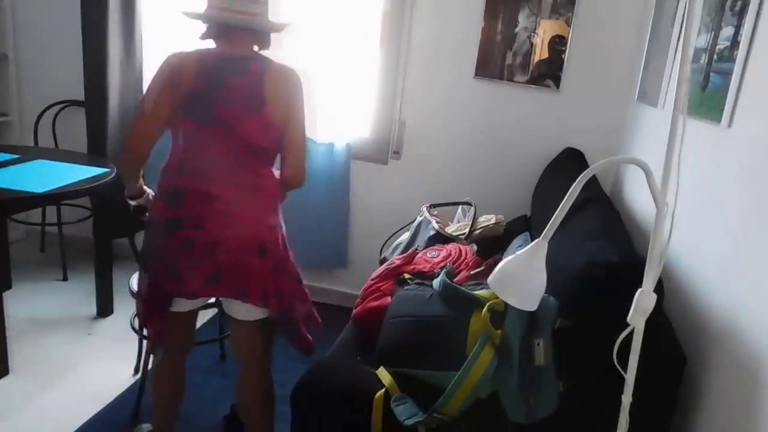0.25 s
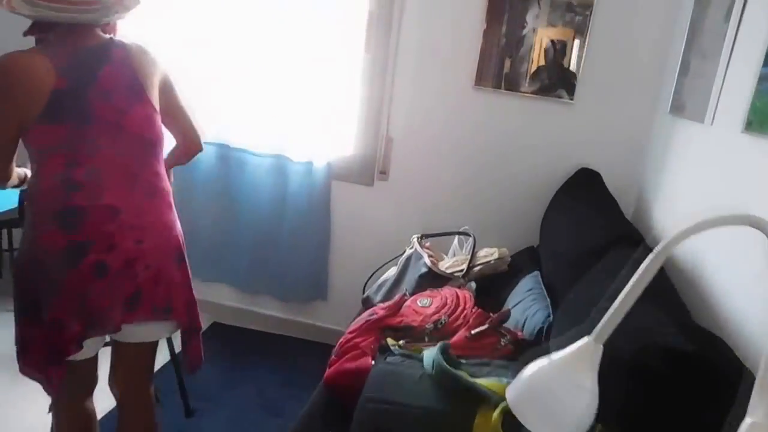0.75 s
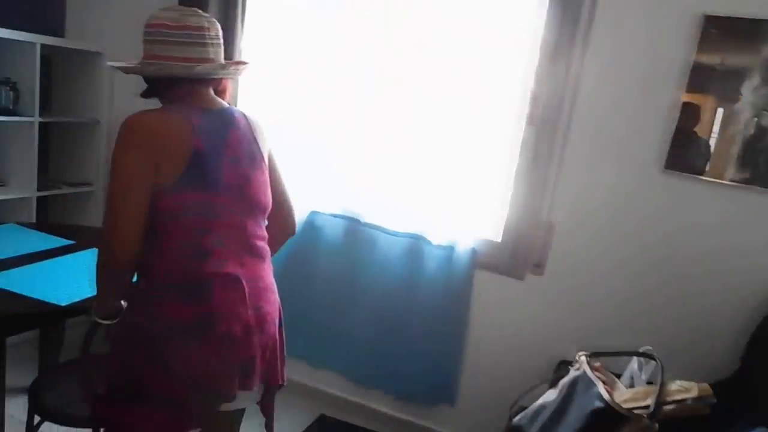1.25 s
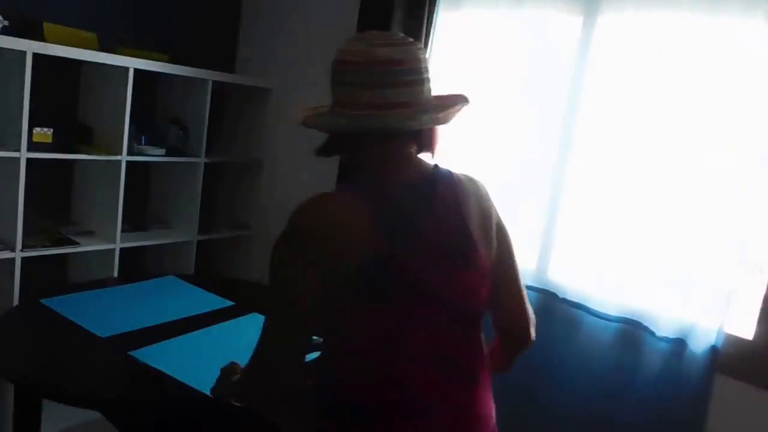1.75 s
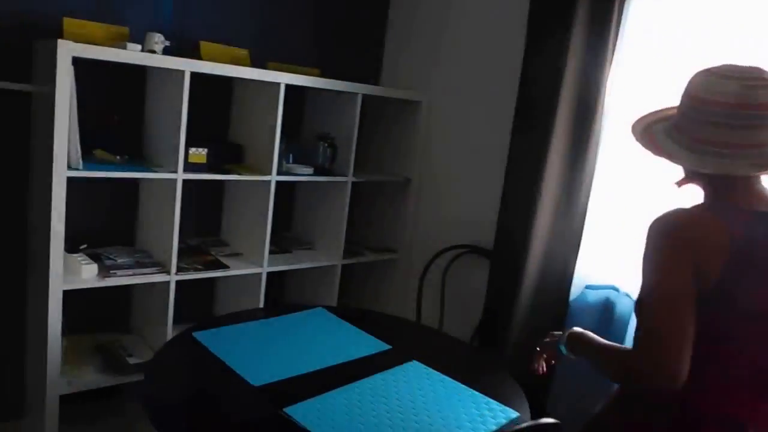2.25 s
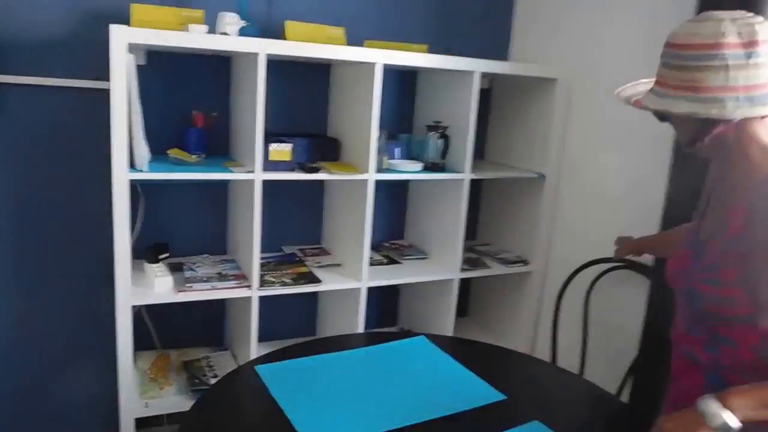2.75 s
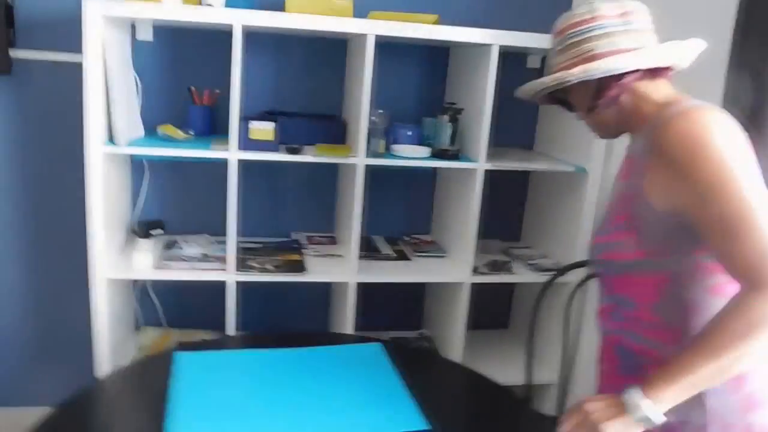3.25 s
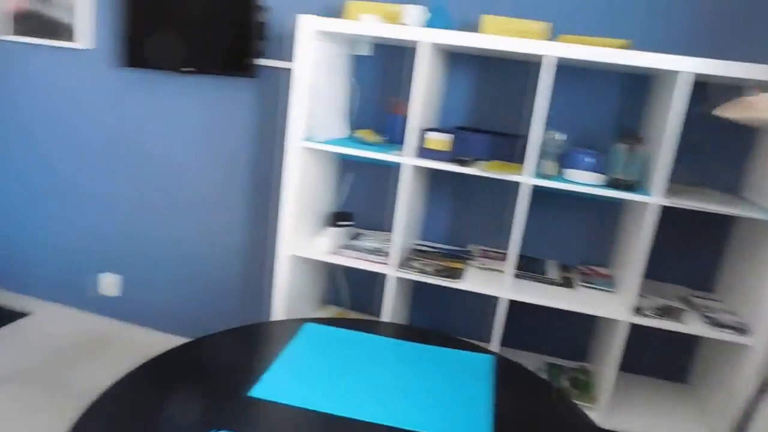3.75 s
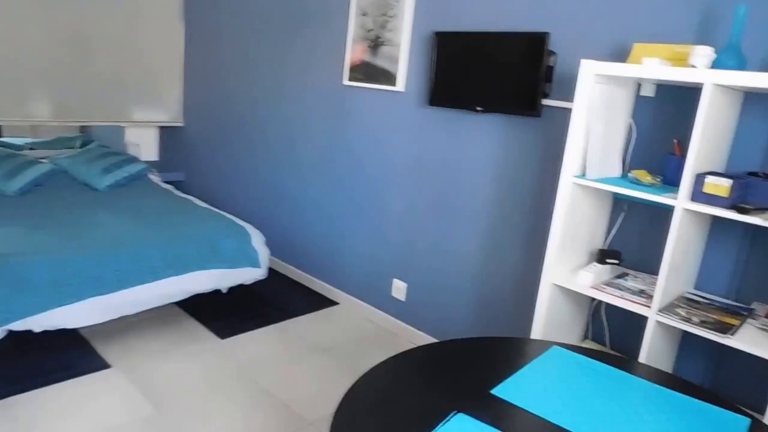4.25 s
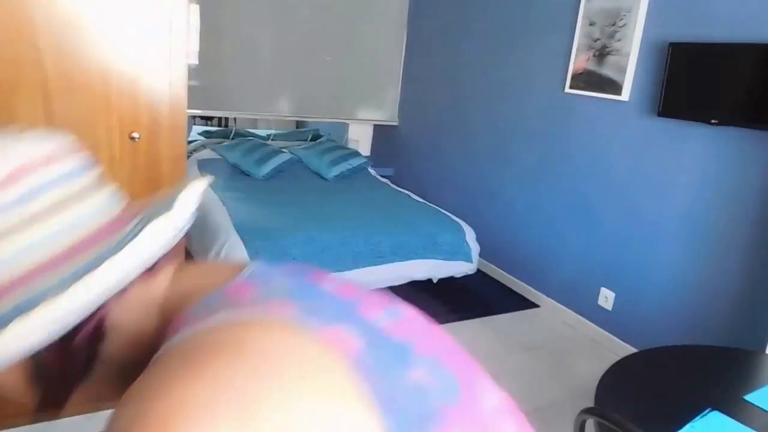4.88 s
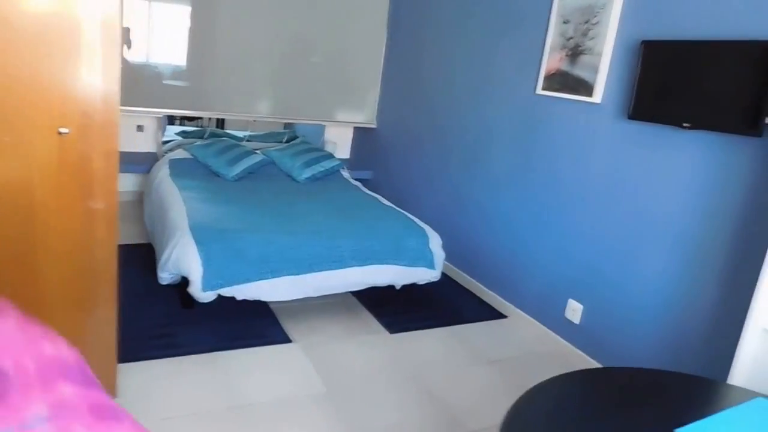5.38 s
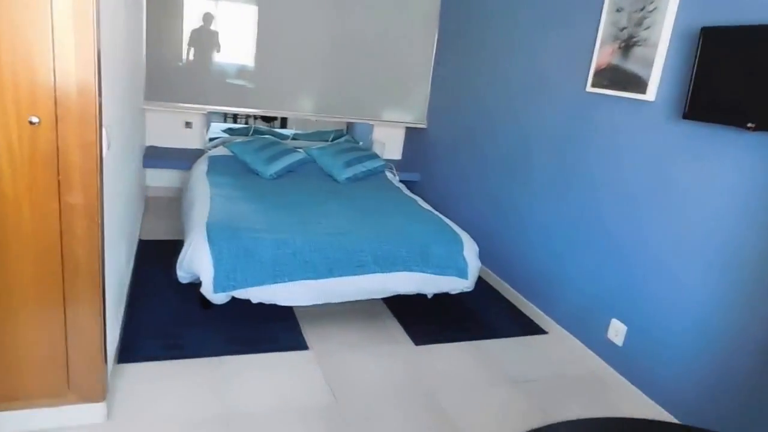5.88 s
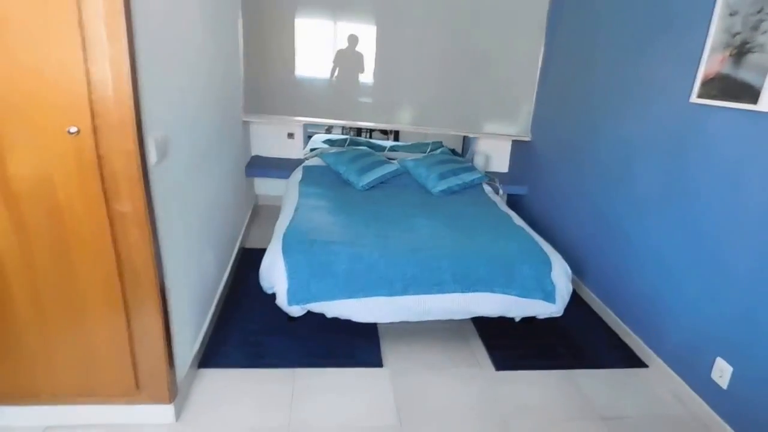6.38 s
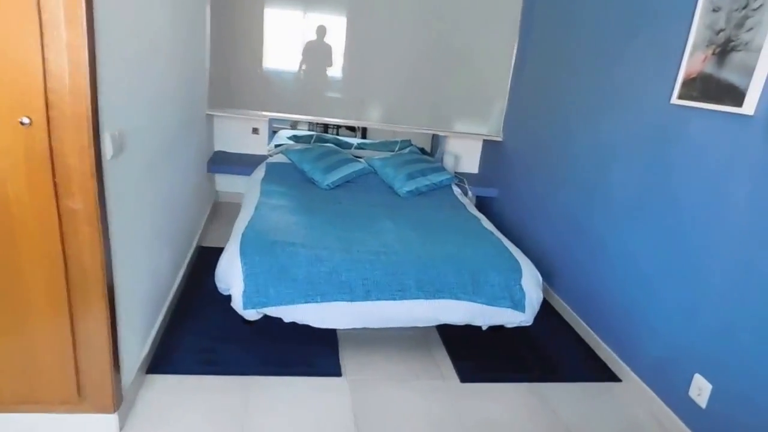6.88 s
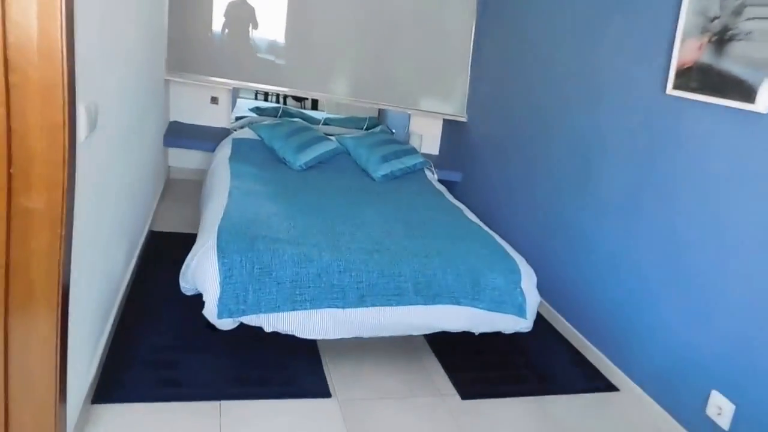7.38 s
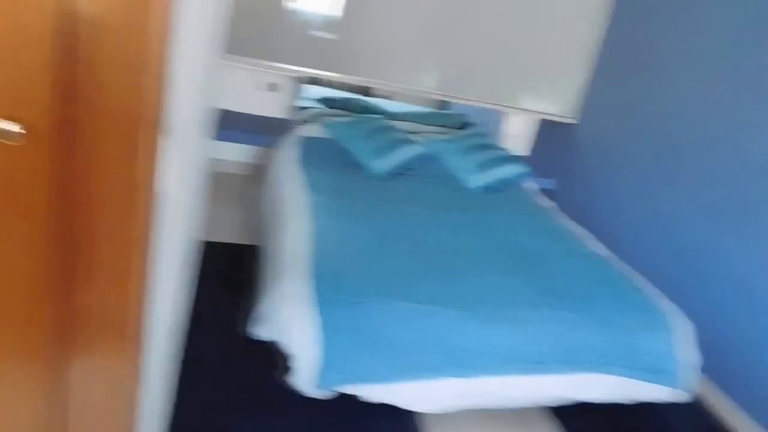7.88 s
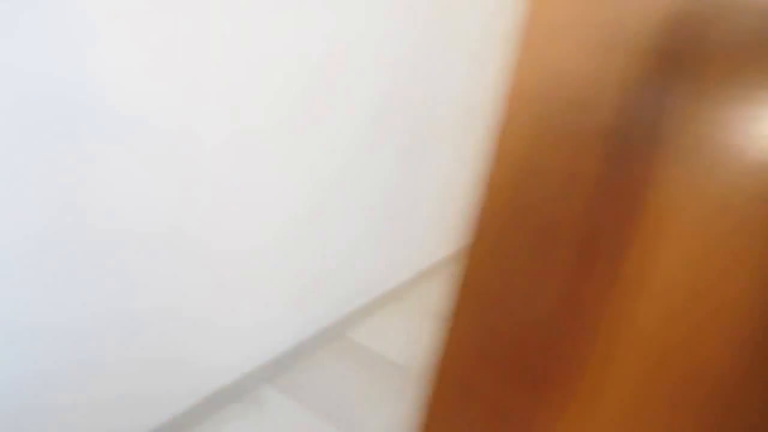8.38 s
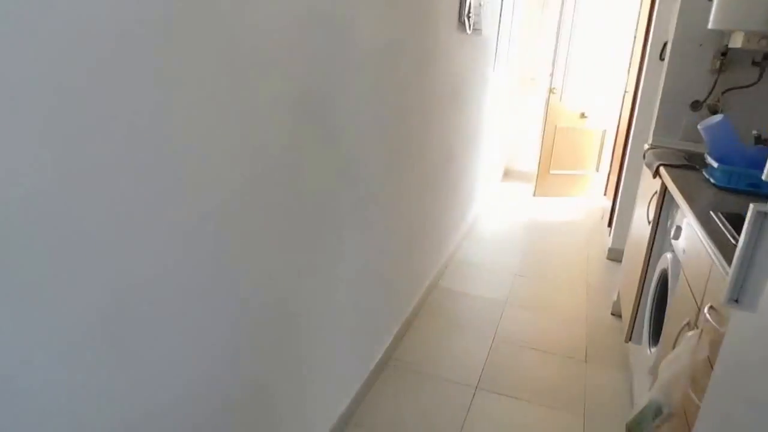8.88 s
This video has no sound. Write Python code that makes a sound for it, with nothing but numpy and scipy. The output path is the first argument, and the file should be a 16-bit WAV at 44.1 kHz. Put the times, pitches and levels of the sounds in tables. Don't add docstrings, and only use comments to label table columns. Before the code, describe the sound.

Close stereo pickup of a small hard-floored room: steady soft hiss and light shuffling, then a sudden clack and short rough scrape of metal chair legs on tile. After a pause comes a second, stuttering drag with several short squeaky tones and sharp knocks. The rest is quiet movement: sandal steps, a tiny squeak, sparse ticks, a small clack, muted creaks and soft floor thuds.

```python
import sys
import numpy as np
from scipy import signal
from scipy.fft import rfft, irfft, next_fast_len
from scipy.io import wavfile
from scipy.ndimage import uniform_filter1d

SR = 44100
rng = np.random.default_rng(int(sys.argv[2]) if len(sys.argv) > 2 else 0)


def wrap_up_sound(samples):
    columns = np.atleast_2d(samples).T
    tamed = np.clip(columns, -1, 1)
    steps = np.round(tamed * 32767).astype(np.int16)
    wavfile.write(sys.argv[1], SR, steps)


def volts_from_decibels(level):
    exponent = np.asarray(level, float) / 20
    return 10 ** exponent


N = 403074


def rms_one(x):
    return x / np.sqrt(np.mean(x ** 2) + 1e-20)


def add(out, start_s, x):
    part = out[round(start_s * SR):][:len(x)]
    part += x[:len(part)]


def butter(x, order, hz, kind="low"):
    return signal.sosfilt(signal.butter(order, hz, kind, fs=SR, output="sos"), x)


def colour(x, points):
    size = next_fast_len(len(x) + 4096)
    hz = np.maximum(np.fft.rfftfreq(size, 1 / SR), 1)
    point_hz, point_db = np.array(points).T
    gain = volts_from_decibels(np.interp(np.log(hz), np.log(point_hz), point_db))
    return irfft(rfft(x, size) * gain, size)[:len(x)]


def split(x, low_hz, high_hz):
    low = signal.sosfiltfilt(signal.butter(3, low_hz, fs=SR, output="sos"), x)
    high = signal.sosfiltfilt(signal.butter(3, high_hz, "high", fs=SR, output="sos"), x)
    return low, x - low - high, high


def drift(rate_hz):
    r = np.exp(-80 * np.pi * rate_hz / SR)
    noise = rng.standard_normal(N // 40 + 2002)
    slow = rms_one(signal.lfilter([1], [1, -2 * r, r * r], noise)[2000:])
    return np.interp(np.arange(N) / 40, np.arange(len(slow)), slow)


def envelope(s, hold_s, rise, fall):
    lead_s = 45 / rise
    length_s = lead_s + abs(hold_s) + 60 / fall
    t = np.arange(int(length_s * SR)) / SR - lead_s
    gain_db = np.minimum(rise * t, fall * (hold_s - t))
    return s - lead_s, volts_from_decibels(np.minimum(0, gain_db))


def ring(push, hz, t60_s):
    r = volts_from_decibels(-60 / (t60_s * SR))
    w = 2 * np.pi * hz / SR
    return signal.lfilter([0, np.sin(w)], [1, -2 * r * np.cos(w), r * r], push + 1e-18)


def burst(t60_s):
    t = np.arange(SR // 2) / SR
    return rng.standard_normal(len(t)) * volts_from_decibels(-60 * t / t60_s)


def air():
    # hz, level_db
    tone_points = [(12, -52), (20, -27), (65, -14.5), (268, -18), (307, -13), (360, -16), (434, -12.5),
                   (496, -12.5), (538, -9), (895, -2.5), (1340, 2), (1450, 3.5), (2980, 2), (9690, -11.5),
                   (12000, -14.5), (15600, -78), (22000, -120)]
    # hz, side_minus_mid_db
    side_points = [(60, -21), (110, -30), (200, -13), (350, -10), (630, -11), (1150, -10), (2070, -14),
                   (3730, -6), (6720, -4), (12100, -4.5)]
    rest_levels = [-71, -57.5, -61.5]
    # pitch_hz, level_db
    hum_lines = [(64.6, -99.5), (306.8, -81.5)]
    # middle_s, length_s, over_room_tone_db, hiss_db
    shuffles = [(0.12, 0.15, -1, 1), (0.358, 0.33, 1.5, -10), (0.573, 0.18, 4, -7), (0.846, 0.33, -1, -13),
                (1.072, 0.33, 0.5, -16), (2.136, 0.077, -8, -11), (2.403, 0.13, -0.5, -3.4),
                (2.833, 0.33, 1, 1), (4.76, 0.26, 2.1, -0.5), (5, 0.13, -1, -0.1), (5.11, 0.08, -9, -13),
                (5.39, 0.45, 0, -20), (5.69, 0.078, 2.8, -18), (5.847, 0.43, -1, -3), (6.37, 0.19, 1, -8),
                (6.547, 0.47, 1, 0.7), (6.84, 0.19, -1.5, 0.5), (7.034, 0.22, 1, -1.5),
                (7.446, 0.34, -3.5, 2), (7.621, 0.1, -0.5, 2), (7.78, 0.38, -9, 1), (7.904, 0.22, 1.5, -15),
                (8.084, 0.049, 2.5, -13), (8.28, 0.33, -1, 4), (8.557, 0.41, -1, 4), (8.977, 0.44, -2.7, 1)]
    power = np.ones((3, N))
    for middle_s, length_s, db, hiss_db in shuffles:
        swell = np.hanning(int(length_s * SR))
        for layer, share_db in zip(power, (-4, 0, hiss_db)):
            add(layer, max(middle_s - length_s / 2, 0), volts_from_decibels(db + share_db) ** 2 * swell)
    pair = []
    for points in ([(20, 0), (12000, 0)], side_points):
        noise = colour(rng.standard_normal(N), tone_points)
        pair.append(split(colour(noise, points), 700, 4000))
    out = np.zeros((2, N))
    for mid, side, db, p in zip(*pair, rest_levels, power):
        level = volts_from_decibels(db + 0.94 * drift(21)) * np.sqrt(p)
        out += level * np.array([mid + side, mid - side]) / np.std(mid)
    t = np.arange(N) / SR
    for hz, db in hum_lines:
        out += volts_from_decibels(db - 1 + 2 * drift(13)) * np.sin(2 * np.pi * hz * t)
    return out


def port_wind():
    rumble = rms_one(butter(rng.standard_normal((2, N)), 2, 70))
    return volts_from_decibels(-91.5 + 3 * drift(3)) * rumble * volts_from_decibels(np.array([[3.5], [-3.5]]))


def small_sounds():
    # start_s, peak_db, pitch_hz, t60_s
    ticks = [(.472, -37, 7200, 0.036), (1.906, -41, 7000, 0.058), (6.012, -27.5, 1400, 0.13),
             (6.012, -33, 2480, 0.2), (6.688, -34.5, 8600, 0.052), (6.688, -41, 5170, 0.33),
             (7.779, -35.5, 3040, 0.2), (7.845, -37.5, 9500, 0.023), (7.845, -37, 5660, 0.022),
             (7.959, -32, 9300, 0.013), (8.5, -39.5, 2320, 0.52)]
    # start_s, peak_db, pitch_hz, t60_s
    taps = [
        (.56, -47.5, 625, 0.27),
        (.826, -57, 1110, 0.076),
        (2.784, -48, 566, 0.087),
        (4.697, -59, 1500, 0.16),
        (5.108, -43, 1950, .1),
        (5.25, -48.5, 613, 0.13),
        (6.03, -48, 1230, 0.17),
        (6.46, -47, 925, 0.51),
        (7.86, -41.5, 1140, 0.42),
        (8.51, -53, 1680, 0.39),
    ]
    # start_s, peak_db, pitch_hz, t60_s
    thuds = [
        (1.288, -46.5, 106, 0.53),
        (1.6, -60, 119, 0.58),
        (3.27, -58, 140, 0.6),
        (4.119, -61, 89, 0.35),
        (4.305, -52, 59.6, 0.21),
        (4.779, -62, 56.6, 0.51),
        (5.72, -64, 66, 0.44),
        (6.015, -62, 170, .15),
        (6.029, -62, 52, 0.4),
    ]
    out = np.zeros(N)
    for rows, cycles in ((ticks, 6), (taps, 16), (thuds, 16)):
        for start_s, db, hz, t60_s in rows:
            hit = ring(burst(np.clip(t60_s, .005, .45)), hz, cycles / hz)
            hit = butter(hit, 2, hz / 2, "high")
            add(out, start_s, volts_from_decibels(db - 3) * hit / np.abs(hit).max())
    return out


def knocks():
    # start_s, peak_db, treble_db
    knock_hits = [
        (1.215, -35, -5),
        (1.284, -14.5, -23),
        (1.31, -9, -10),
        (1.326, -11.5, -26),
        (3.451, -17, -20),
        (4.256, -12.5, -20),
        (4.307, -15, 1),
        (6.01, -29, -18),
    ]
    mids, highs = np.zeros(N), np.zeros(N)
    for start_s, db, treble_db in knock_hits:
        crack = volts_from_decibels(db) * (burst(0.055) + volts_from_decibels(-1.5) * burst(.008))
        add(mids, start_s, crack)
        add(highs, start_s, volts_from_decibels(treble_db) * crack)
    body = butter(mids, 2, [800, 3900], "band")
    edge = butter(highs, 2, [3300, 9500], "band")
    return volts_from_decibels(-2) * body + volts_from_decibels(-5.5) * edge


def squeals():
    # start_s, hold_s, pitch_hz, level_db, overtone_db
    locked = [(1.345, 0.072, 822, -34, -2), (1.49, 0.016, 843, -37, -1), (1.785, 0.051, 1147, -27.5, -21.5),
              (3.135, 0.14, 995, -36, -7), (3.205, 0.011, 1137, -30.5, -22), (3.238, 0.032, 1210, -31, -18),
              (3.625, 0.068, 1096, -30, -10), (3.775, 0.064, 856, -34, 8.5), (3.89, 0.077, 864, -39, 7.5),
              (4.06, 0.092, 1084, -36, -24), (4.19, 0.036, 1090, -33, -15)]
    # start_s, hold_s, pitch_hz, level_db
    singing = [(1.53, 0.055, 1154, -38), (1.63, 0.2, 1142, -41), (1.645, 0.015, 2195, -39),
               (1.799, 0.033, 3460, -48.5), (1.8, 0.023, 4600, -51), (1.9, 0.1, 1153, -65),
               (3.563, 0.026, 1094, -35.5), (3.63, 0.086, 1460, -43.5), (3.838, 0.094, 1630, -33),
               (3.859, 0.025, 2284, -30), (3.96, .03, 860, -35), (4.05, 0.067, 1467, -35.5)]
    overtone_steps = [0, -12, -25, -29]
    sandal = (5.268, .015, 436, -59)  # start_s, hold_s, pitch_hz, level_db
    out = np.zeros(N)
    pitch = 1 + .0035 * drift(60)
    waver = volts_from_decibels(2 * drift(60))
    for row in [*locked, *singing, sandal]:
        s, hold_s, hz, db, *overtone_db = row
        start, gain = envelope(s, hold_s, rise=700.5, fall=383)
        first = round(start * SR)
        here = slice(first, first + len(gain))
        sag_hz_per_s = 550 if row is sandal else 0
        sag = sag_hz_per_s * (np.arange(len(gain)) / SR - s + start)
        phase = 2 * np.pi * np.cumsum((hz - sag) * pitch[here]) / SR
        levels = [0] + [over + step for over in overtone_db for step in overtone_steps]
        stack = sum(volts_from_decibels(level) * np.sin((k + 1) * phase) for k, level in enumerate(levels))
        add(out, start, np.sqrt(2) * volts_from_decibels(db) * gain * waver[here] * stack)
    return out


def grit_clicks():
    sizes_db = 2.5 * np.minimum(rng.exponential(1, N), 4)
    clicks = volts_from_decibels(sizes_db) * rng.choice([-1, 1], N)
    hits = rng.random(N) < 7000 / SR
    return rms_one(clicks * hits * volts_from_decibels(1.5 * drift(70)))


def tile_slab(push):
    # pitch_hz, t60_s, level_db
    slab_modes = [(253.5, 1, -11), (322, 0.27, -11), (390, 0.45, -7)]
    return sum(volts_from_decibels(db + 2 * drift(14)) * rms_one(ring(push, hz, t60_s)) for hz, t60_s, db in slab_modes)


def frame(push):
    # pitch_hz, level_db
    tube_modes = [(625, -1.5), (790, -5.5), (835, 4), (895, 17.5), (950, -3), (1040, -1), (1095, -4.5),
                  (1146, -8.5), (1240, 11), (1377, 13.5), (1468, -10), (1630, 16), (1710, -15), (1800, -7),
                  (1910, 9.5), (2020, 7.5), (2095, 0.5), (2195, -10.5), (2295, 1), (2380, -18), (2460, 1.5),
                  (2565, -22.5), (2700, 1), (2800, -54), (2980, -16)]
    return sum(ring(push * volts_from_decibels(db + 5 * drift(8.5)), hz, .08) for hz, db in tube_modes)


def bright_frame(push):
    # pitch_hz, width_hz, level_db
    short_modes = [(5960, 59, 7.5), (6710, 27, -7), (6500, 71, -41.5), (7280, 66, -12.5), (7440, 12, -9.5),
                   (8350, 300, 3), (10660, 150, -8.5), (11100, 280, -2)]
    out = np.zeros(N)
    for k, (hz, width_hz, db) in enumerate(short_modes):
        out += (-1) ** k * volts_from_decibels(db + 5 * drift(12)) * rms_one(ring(push, hz, 1.1 / width_hz))
    return out


def stroke_power():
    # start_s, hold_s, grinding_db, speed_hiss_db, tile_weight_db
    jerks = [
        (1.2145, 0.0042, -29, -24.5, -18),
        (1.285, 0.11, -25, -24, -36),
        (1.311, 0.011, -30, -17, -28),
        (1.595, 0.042, -25, -22.5, -27),
        (3.121, 0.088, -35.5, -32, -29),
        (3.253, 0.071, -23.5, -24, -19),
        (3.451, .012, -29, -26, -29),
        (4.257, 0.038, -26.5, -14.5, -15.5),
        (4.309, 0.0067, -27, -1, -30),
    ]
    # start_s, hold_s, grinding_db, speed_hiss_db, tile_weight_db
    shoves = [(1.46, 0.11, -32, -21, -22.5), (1.65, 0.043, -26, -25.5, -30),
              (1.73, 0.031, -36.5, -31, -17.5), (1.81, 0.028, -37, -22.5, -30), (3.1, .02, -61, -5, -15),
              (3.185, 0.064, -31, -25.5, -35), (3.49, 0.039, -37, -26, -22), (3.545, 0.05, -37, -26, -33),
              (3.645, 0.031, -34, -11.5, -29), (3.78, 0.041, -31.5, -19, -27),
              (3.86, 0.098, -27, -21.5, -37), (3.985, 0.073, -28, -22, -19.5),
              (4.09, 0.082, -27.5, -15, -25.5), (4.2, 0.08, -29.5, -18, -19),
              (4.345, 0.024, -28.5, -27, -16.5), (4.41, 0.011, -39.5, -28, -9)]
    power = np.zeros((4, N))
    for rows, rise in ((jerks, 12000), (shoves, 314)):
        for s, hold_s, db, speed_db, weight_db in rows:
            start, gain = envelope(s, hold_s, rise, fall=234)
            bright_db = -2 + 0.72 * speed_db
            for layer, share_db in zip(power, (0, bright_db, speed_db, weight_db)):
                add(layer, start, (volts_from_decibels(db + share_db) * gain) ** 2)
    return power


def scrape():
    # hz, level_db
    grind_points = [(88, -53), (150, -35), (476, -32), (841, -4.5), (1130, -7), (1350, -6), (1690, -4),
                    (2570, -3), (3450, -10), (5760, -15), (8950, -18.5), (11300, -23), (11900, -45),
                    (15600, -65), (22000, -120)]
    grit = grit_clicks()
    shifted_grit = np.roll(grit, SR)
    low, mid, high = split(colour(grit, grind_points), 490, 3600)
    low = rms_one(low) + tile_slab(shifted_grit)
    mid = rms_one(mid) + volts_from_decibels(-5) * rms_one(frame(shifted_grit))
    mid = butter(mid, 3, 450, "high")
    mid = sum(volts_from_decibels(1.6 * drift(9)) * part for part in split(mid, 1150, 2100))
    high = rms_one(high) + volts_from_decibels(-11) * rms_one(bright_frame(shifted_grit))
    _, bright, sizzle = split(high, 2500, 6800)
    layers = (mid, bright, sizzle, low)
    return sum(np.sqrt(p) * rms_one(x) for p, x in zip(stroke_power(), layers))


def room(x, wet_db):
    # hz, side_minus_mid_db
    width_points = [(60, -12), (110, -14), (200, -25), (350, -23), (630, -24), (1150, -25), (2070, -20),
                    (3730, -11.5), (6720, -1), (9500, -1), (12100, -11)]
    t = np.arange(int(.6 * SR)) / SR
    fade = volts_from_decibels(-60 * t / 0.22) * np.clip(t / .006, 0, 1)
    tails = rng.standard_normal((2, len(t))) * fade
    tails /= np.sqrt(np.sum(tails ** 2, axis=1, keepdims=True))
    wet, other = signal.fftconvolve(x[None], tails, axes=1)[:, :N]
    mid = x + volts_from_decibels(wet_db) * wet
    side = volts_from_decibels(.5) * colour(other, width_points)
    return np.array([volts_from_decibels(.3) * mid + side, mid - side])


def scene():
    chair = butter(scrape() + knocks(), 3, 160, "high")
    return room(chair + small_sounds(), wet_db=-7.5) + room(squeals(), wet_db=-13) + air()


def thin_treble(x, weak, depth_db, contrast):
    hz, _, cells = signal.stft(x, SR, nperseg=2048)
    power = np.abs(cells.sum(axis=0)) ** 2 + 1e-20
    share = uniform_filter1d(power, size=8, axis=0) / uniform_filter1d(power, size=64, axis=0)
    gain = np.where(share < weak, volts_from_decibels(depth_db), share ** contrast)
    reach = np.clip((hz[:, None] - 2300) / 2000, 0, 1)
    return signal.istft(cells * gain ** reach, SR, nperseg=2048)[1][:, :N]


def roll_off(x):
    return signal.sosfilt(signal.butter(12, 12150, fs=SR, output="sos"), x)


def record(dry):
    steep = signal.ellip(10, .5, 70, 11900, fs=SR, output="sos")
    x = signal.sosfilt(steep, dry + port_wind())
    x = thin_treble(x, weak=.52, depth_db=-20, contrast=.2)
    return roll_off(x)


dry = scene()
out = record(dry)
wrap_up_sound(out)
```